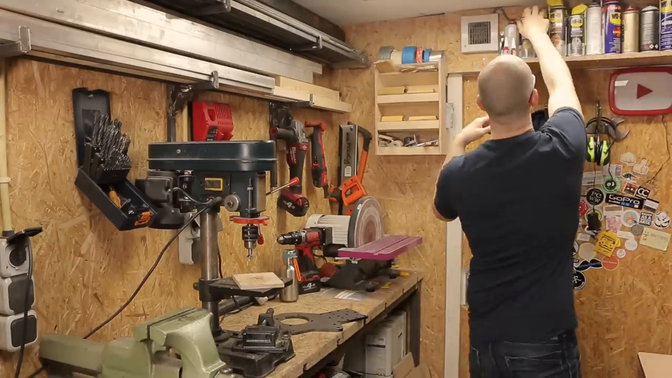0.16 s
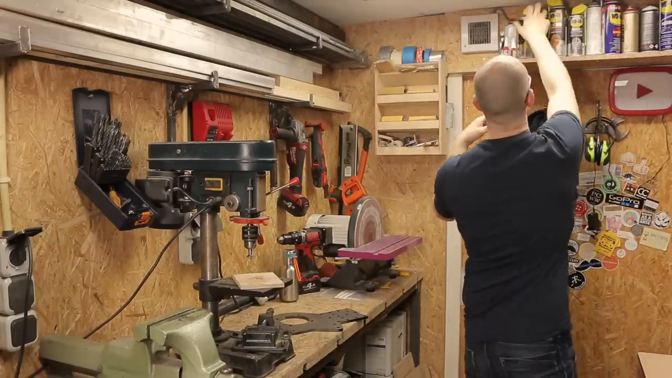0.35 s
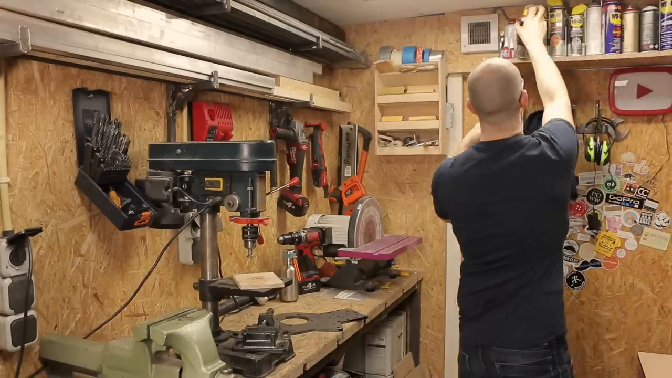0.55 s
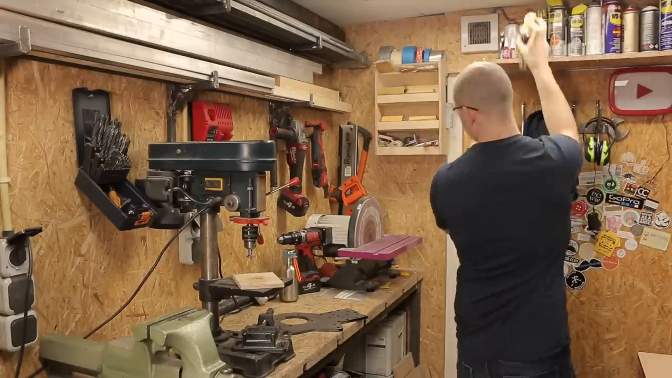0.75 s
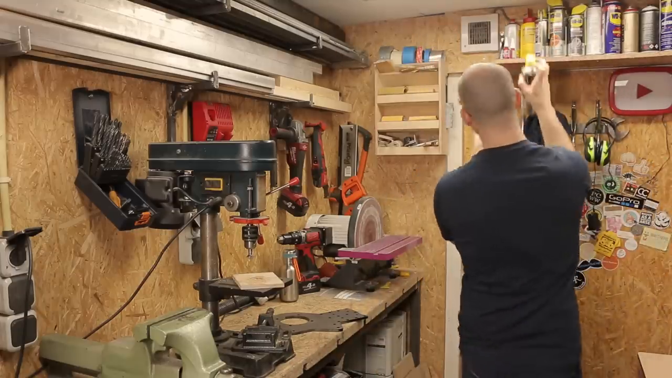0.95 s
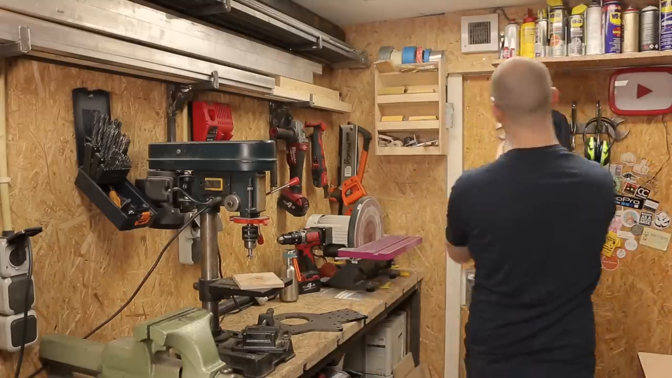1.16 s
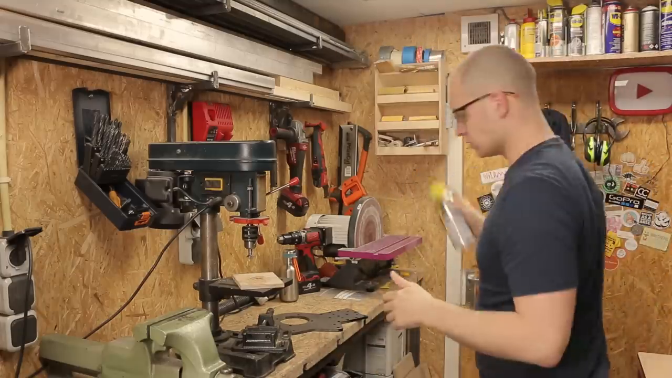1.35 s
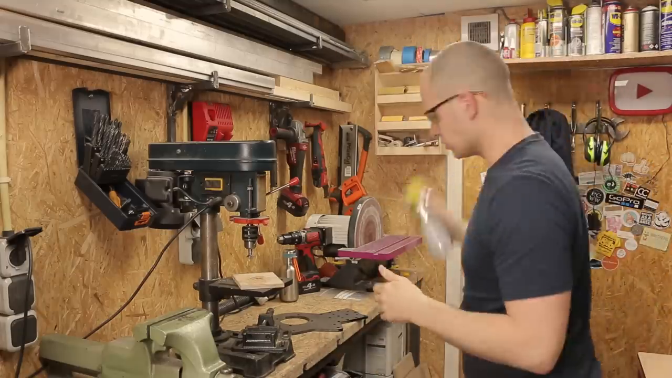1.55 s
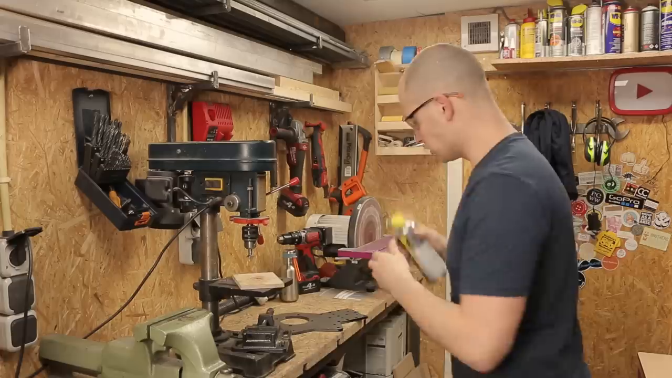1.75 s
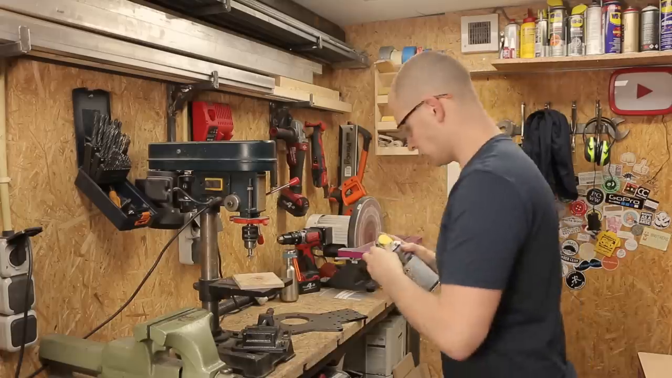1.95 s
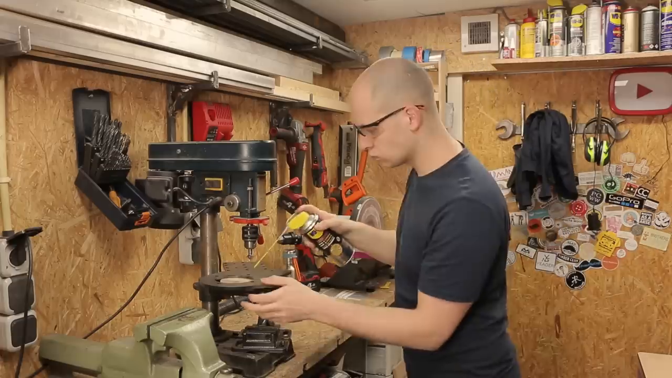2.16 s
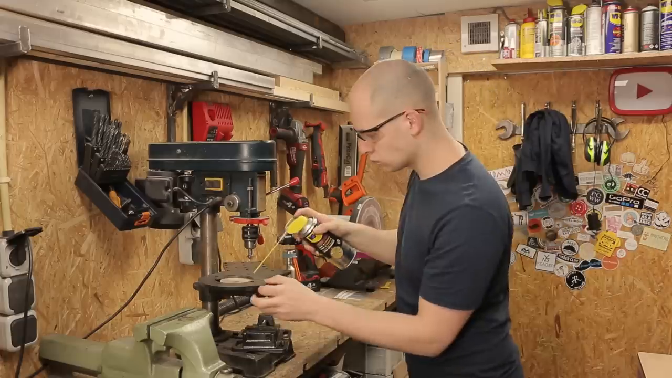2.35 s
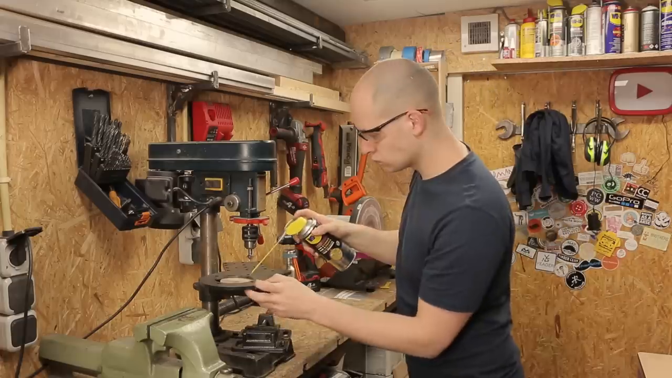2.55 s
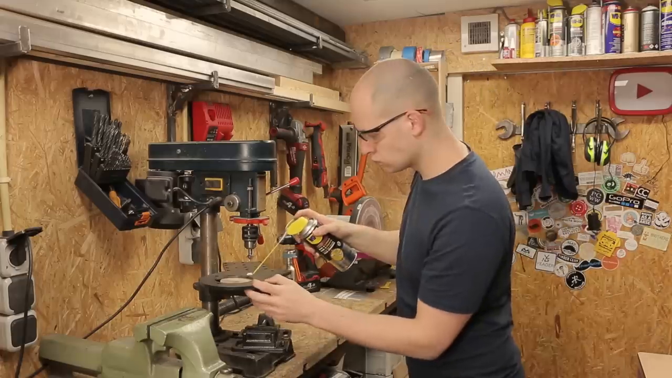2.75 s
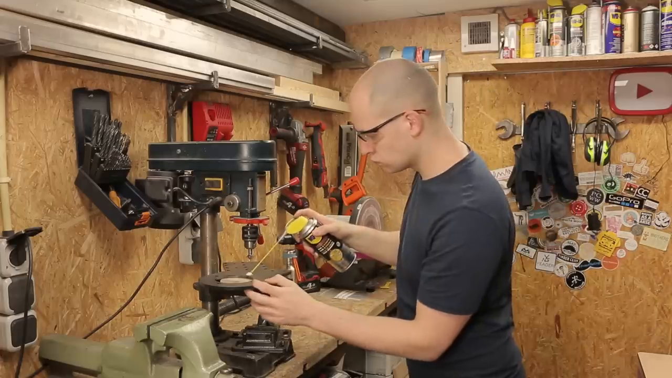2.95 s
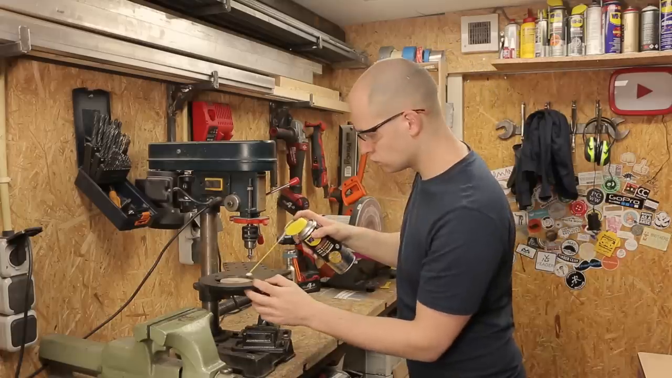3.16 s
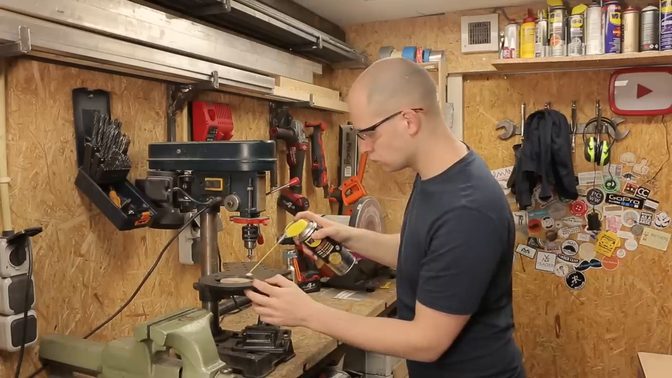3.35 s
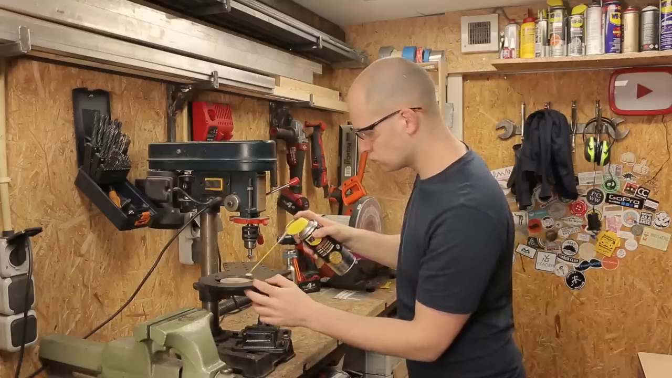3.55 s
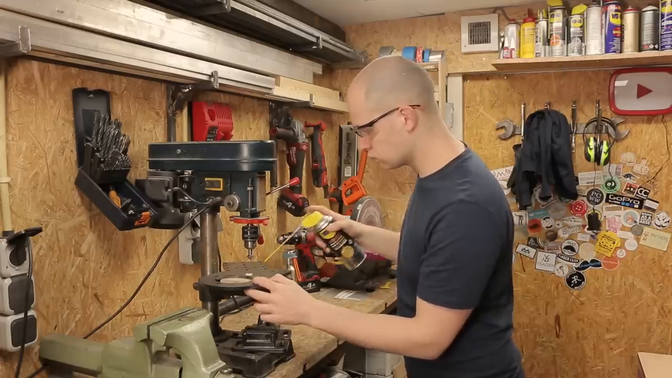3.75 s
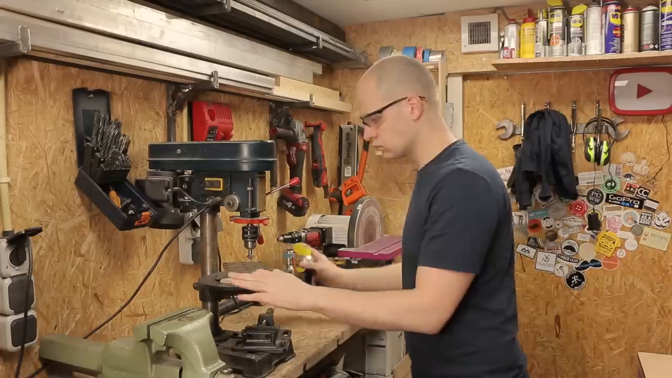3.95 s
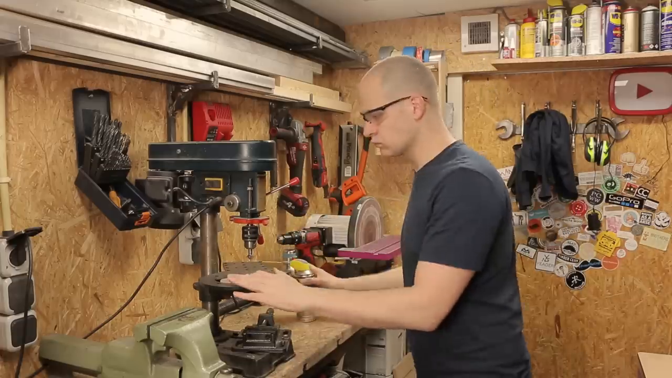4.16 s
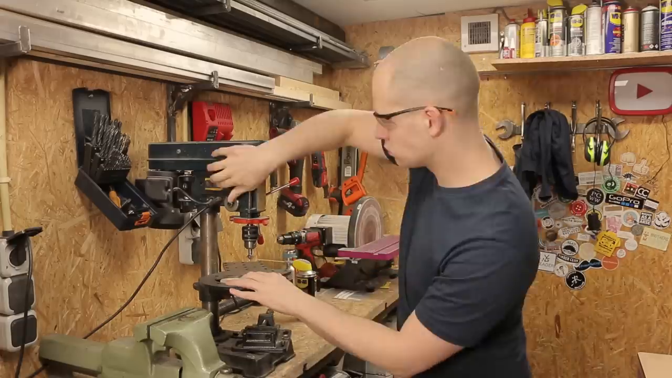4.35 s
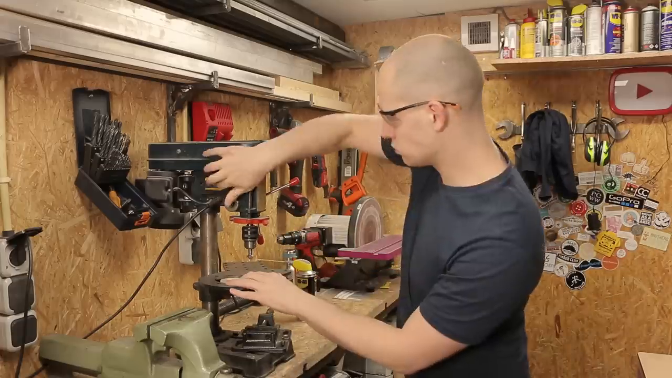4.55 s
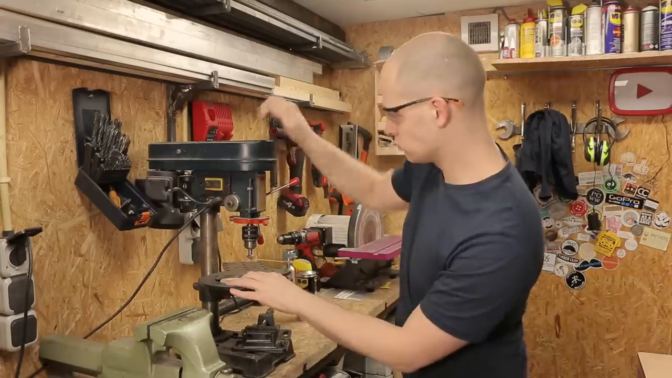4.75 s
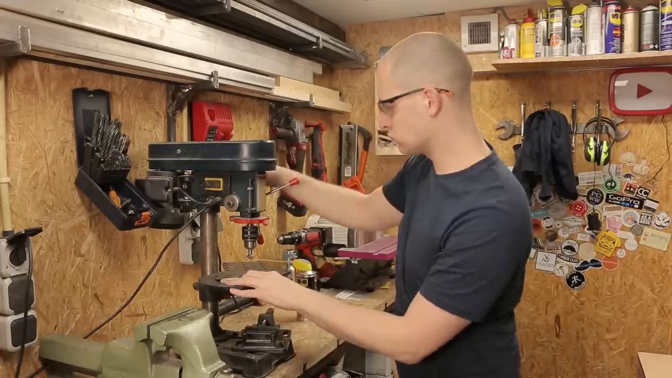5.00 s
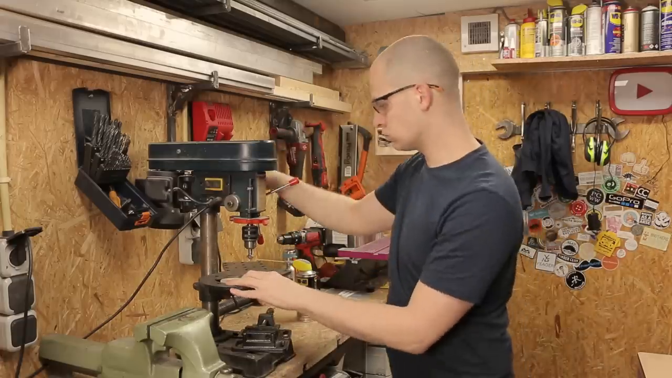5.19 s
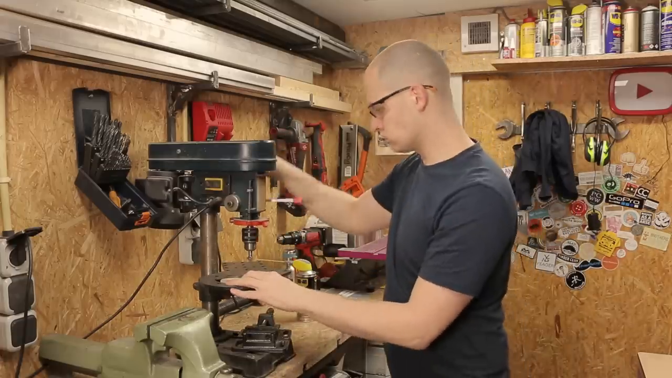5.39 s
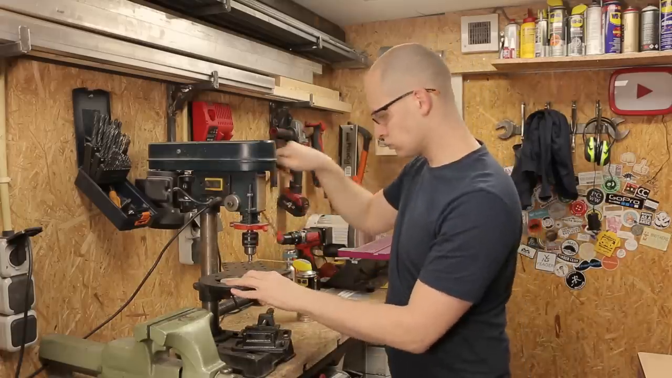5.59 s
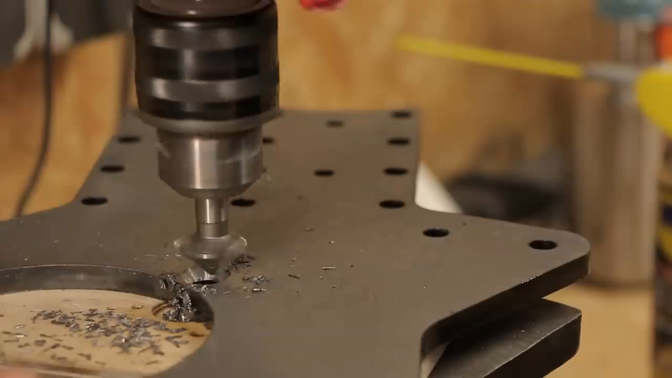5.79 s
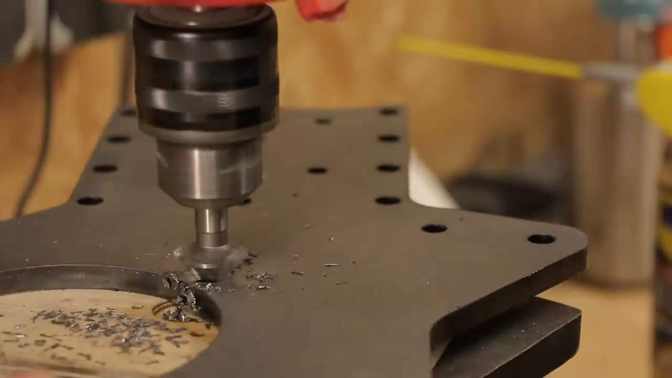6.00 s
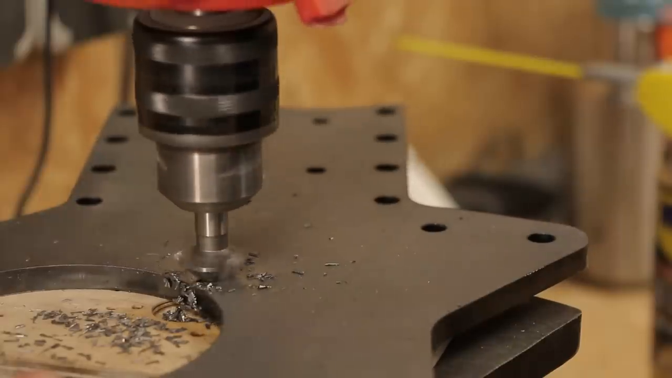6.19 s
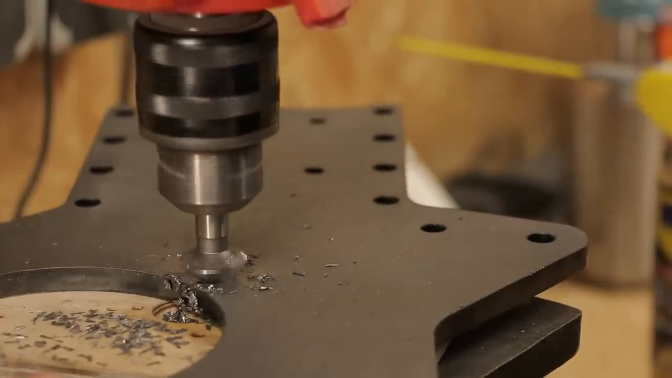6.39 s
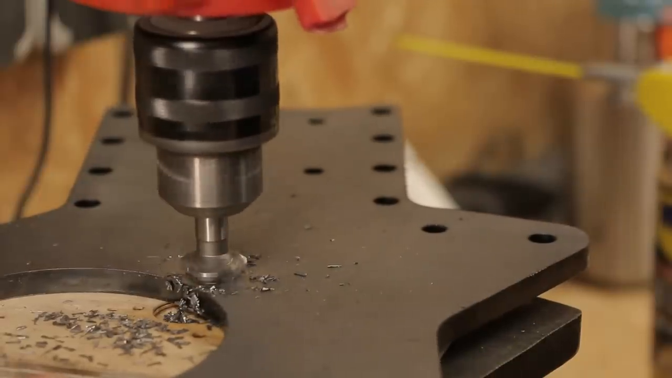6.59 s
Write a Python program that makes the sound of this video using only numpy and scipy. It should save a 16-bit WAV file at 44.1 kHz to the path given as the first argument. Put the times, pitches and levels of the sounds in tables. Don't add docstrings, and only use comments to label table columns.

```python
import sys
import numpy as np
from scipy import signal
from scipy.fft import rfft, irfft, next_fast_len
from scipy.io import wavfile
from scipy.ndimage import uniform_filter1d

SR = 44100
rng = np.random.default_rng(int(sys.argv[2]) if len(sys.argv) > 2 else 0)


def materialize(psi):
    bounded = np.clip(np.atleast_2d(psi).T, -1, 1)
    quanta = np.round(bounded * 32767).astype(np.int16)
    wavfile.write(sys.argv[1], SR, quanta)


def voltage_ratio(decibels):
    exponent = np.asarray(decibels, float) / 20
    return 10 ** exponent


N = 292559
TIME = np.arange(N) / SR

# frequency [Hz], density [dB per Hz].
ROOM_SPECTRUM = [(18, -32), (42, 0), (114, -1.5), (195, -16), (363, -14), (988, -26), (1650, -25.5),
                 (3520, -27.5), (3820, -23), (5570, -28.5), (7710, -30.5), (16000, -31.5)]
# frequency [Hz], density [dB per Hz].
STANDBY_SPECTRUM = [(30, -12), (70, 2), (150, -7), (350, -1), (550, -26), (1150, -8), (2500, -18),
                    (5000, -40), (16000, -70)]
# hits and handling break off, then resume, both in seconds [s].
GAP = (4.386, 4.502)
# frequency [Hz], density [dB per Hz].
CLOTH_SPECTRUM = [(880, -23), (1500, -7), (2340, -5.5), (4420, 2), (5280, -5), (12900, -17.5), (16000, -20)]
# frequency [Hz], density [dB per Hz].
SCRAPE_SPECTRUM = [(150, -56), (250, -10), (420, -2.5), (512, -17), (593, -5), (818, -5), (3000, -16),
                   (3900, -66), (6600, -120)]
# peak [s], level [dB], swell [s], fade [s], both over 20 dB.
SLEEVE_STROKES = [(.03, -51, 0.33, 0.13), (.62, -51, 0.18, 0.052), (.776, -53, 0.24, 0.32),
                  (.95, -32, 0.031, 0.056), (1.135, -38, 0.13, 0.086), (1.235, -39, 0.036, 0.081),
                  (1.34, -41.5, 0.11, 0.076), (1.407, -37.5, 0.035, 0.12), (1.56, -44, 0.48, 0.24),
                  (1.66, -34, 0.13, 0.079), (1.763, -42, 0.17, 0.086), (1.9, -56, 0.47, 0.33),
                  (2.318, -59, .26, .05), (4.25, -51, 0.14, 0.29), (4.52, -45, 0.034, 0.037)]
# peak [s], level [dB], swell [s], fade [s], can resonance [Hz].
CAN_RUBS = [(.044, -52.5, .3, 0.11, 1100), (.3, -46, .03, 0.073, 672), (.5, -53.5, 0.15, 0.41, 714),
            (.776, -46, 0.21, 0.2, 1220), (.95, -32.5, 0.038, .11, 1130), (1.125, -38, 0.073, 0.025, 1170),
            (1.15, -27.5, 0.031, 0.045, 915), (1.34, -39.5, 0.07, 0.058, 1090),
            (1.407, -34.5, 0.032, 0.16, 1780), (1.56, -43, 0.093, 0.9, 1820),
            (1.669, -25.5, 0.079, 0.056, 1340), (1.763, -31, 0.14, 0.049, 1440),
            (2.15, -65, 0.04, 0.034, 1460), (2.4, -38, 0.1, 0.035, 1720), (4.18, -27.5, 0.017, 0.087, 714),
            (4.26, -44, 0.06, 0.56, 776), (4.52, -58, 0.023, 0.055, 864)]
# peak [s], level [dB], swell [s], fade [s], resonance [Hz].
WEIGHT_SHIFTS = [(.54, -37, 0.24, 0.43, 109), (.92, -40.5, 0.25, 0.19, 243), (1.7, -40, 0.53, 0.012, 330),
                 (3.15, -48, 0.041, 0.39, 101), (3.68, -37.5, 0.21, 0.14, 148),
                 (3.78, -36.5, 0.34, 0.17, 103), (4.19, -24, .012, 0.45, 236),
                 (4.32, -24.5, 0.11, 0.2, 252)]
# start [s], peak [dB], body [Hz], T60 [s].
BODY_BUMPS = [(.223, -30, 180, 0.21), (0.261, -23, 192, 0.17), (0.274, -36, 70, 0.26),
              (0.464, -26, 160, 0.12), (0.471, -24.5, 70.6, 0.24), (0.927, -35, 104, 0.36),
              (2.25, -55, 3800, 0.44), (3.25, -44.5, 334, 0.96), (4.154, -30, 60, 0.93),
              (4.506, -42, 412, .3), (4.756, -22, 299, 0.23), (5.905, -22, 710, 0.15)]
# start [s], peak [dB], body [Hz], T60 [s], crack [dB].
HOLLOW_TAPS = [(0.264, -23.5, 686, 0.073, -29), (.465, -39.5, 660, 0.044, 1),
               (.552, -44.5, 3640, 0.33, 0.5), (.707, -34, 610, 0.033, -10), (.764, -37, 980, 0.076, 8),
               (0.9212, -12.5, 953, 0.093, -18), (0.9212, -22.5, 392, 0.049, -25),
               (.926, -19.5, 1335, 0.13, 1), (1.074, -33, 4550, 0.15, -18.5), (1.134, -19, 764, 0.03, -1),
               (1.229, -35, 2020, 0.13, -10), (1.402, -26.5, 1810, 0.11, -6), (1.43, -32, 1600, 0.14, 4.5),
               (1.733, -33, 1250, .05, -10), (1.742, -27, 1320, .05, -14), (1.753, -27, 1280, 0.049, -18),
               (1.753, -27, 2150, 0.04, -13), (1.763, -25, 1070, 0.061, -14),
               (1.764, -28, 2190, 0.056, -17), (1.774, -33, 2030, .05, -10), (1.85, -41, 1790, 0.04, -11.5),
               (1.93, -45, 1740, 0.037, -15), (2.098, -47, 1840, .05, -15),
               (2.135, -39.5, 2330, 0.029, -24), (2.156, -54, 1670, 0.024, -15), (.223, -49, 1940, 0.11, 5),
               (.225, -45, 785, 0.1, -10), (0.264, -54, 2650, 0.17, -15), (.552, -49, 2200, .04, -5),
               (.628, -45, 1900, 0.064, -15), (.688, -46, 650, 0.081, -3), (1.978, -37.5, 1750, 0.05, -3.5),
               (2.683, -23.5, 3860, .026, -17), (4.721, -16, 1710, 0.041, -24)]
# start [s], peak [dB], centre [Hz], T60 [s],
# crack [dB].
DRY_TICKS = [(1.2296, -33.5, 8900, 0.071, 1.5), (2.134, -33.5, 4000, .04, -1), (2.341, -45, 3500, .05, -12),
             (2.358, -24, 3460, 0.11, -26), (3.197, -37, 8000, .03, -14), (3.205, -34, 7500, .03, -14),
             (3.826, -42, 8000, .03, -14), (3.855, -40, 8500, .03, -14), (3.319, -31, 9000, .12, 1.5),
             (3.842, -38, 7630, 0.085, -9), (3.873, -33, 7500, 0.058, -1.5), (2.359, -27, 1800, .1, -25),
             (4.38, -26, 1600, 0.045, -3), (4.505, -35, 5930, 0.068, 5)]
# frequency [Hz], level [dB], T60 [s].
CAP_MODES = [(743, -18, .1), (880, -15, .1), (1320, -16, .12), (1560, -4, 0.055), (1743, -2, 0.2),
             (1820, 5, 0.12), (2270, -18, .15), (3210, -24, 0.14), (3445, -16, 0.093), (4100, -22, 0.16),
             (4800, -25, 0.15)]
# start [s], peak [dB].
CAP_SNAPS = [
    (2.3575, 0.5),
]
# frequency [Hz], level [dB], T60 [s].
CAN_MODES = [(250, 9.5, 0.15), (197, 4.5, 0.18), (307, -8.5, 0.093), (415, -10.5, 0.21), (546, -5, 0.11),
             (653, -2, 0.16), (800, -5, 0.079), (998, -6.5, 0.16), (1250, -11, 0.021), (1405, 7, 0.03),
             (1900, -5.5, 0.025), (2640, -21, 0.049), (3220, -3, 0.033), (4250, -10.5, 0.071),
             (4800, -14, 0.045)]
# start [s], level [dB], contact [Hz].
CAN_BLOWS = [
    (4.1493, -3.5, 4950),
    (4.178, -17, 400),
    (4.197, -31, 400),
]
# start [s], level [dB], bench resonance [Hz], T60 [s].
CAN_ROCKS = [(4.222, -18, 240, .08), (4.246, -10, 266, .07), (4.271, -8, 267, .06), (4.289, -11, 250, .07),
             (4.306, -14, 299.5, 0.22), (4.251, -6, 1340, .4), (4.305, -5, 1338, .4),
             (4.353, 1.5, 265, 0.096), (4.354, -12, 160, 0.1), (4.364, -7, 340, 0.048)]
# frequency [Hz], level [dB], T60 [s].
SWITCH_MODES = [(110, -17, 0.66), (416, -15, 0.38), (1060, -4.5, 0.024), (2200, -8, 0.04),
                (4310, -2.5, 0.022), (6560, -8, 0.12), (6800, -12, 0.17)]
# start [s], peak [dB].
SWITCH_CLACKS = [
    (4.504, -8.5),
]
# time [s], jet level [dB], gas share of the top end [dB].
VALVE_PRESSES = [
    [(2.612, -73, -3), (2.616, -52, -16), (2.64, -36, -8), (2.67, -40.5, 1.5), (2.682, -31.5, -0.5),
     (2.714, -32, -9), (2.798, -27.5, -7.5), (2.912, -31.5, -5), (3.0, -32, -7.5)],
    [(3.0, -31, -7.5), (3.132, -39, -10.5), (3.148, -36.5, -4.5), (3.196, -42, -15), (3.224, -42.5, -9),
     (3.24, -38.5, -5), (3.274, -51, -21), (3.308, -54, -12), (3.314, -44, -16)],
    [(3.314, -53, -9), (3.322, -55, 17), (3.338, -41, 3.5), (3.476, -37, -4), (3.604, -31.5, -9.5),
     (3.646, -38.5, -11), (3.7, -36, -3)],
    [(3.7, -35.5, -12), (3.744, -43, -10), (3.77, -39, -5), (3.792, -37, -16), (3.834, -50, -22),
     (3.842, -53, -16), (3.866, -48, -5), (3.874, -46, -9), (3.95, -59, -12)],
]
# frequency [Hz], density [dB per Hz].
JET_SPECTRUM = [(180, -47), (300, -28), (656, -5.5), (1030, -11.5), (1360, -6), (2320, -5), (2980, -2),
                (16000, -6)]
# frequency [Hz], width [Hz], level [dB].
STRAW_PEAKS = [(2360, 200, -3), (3030, 200, 0), (3910, 260, 0), (4620, 180, -2), (5310, 180, -4),
               (6500, 200, -5), (7620, 220, -2), (9920, 260, -2), (12200, 260, -3), (13500, 260, -4)]
# multiple of the turn rate [1], level [dB].
PULLEY_ORDERS = [(8, -50), (9, -44), (10, -37), (13, -49), (14, -43), (29, -40)]
# frequency [Hz], density [dB per Hz].
RUMBLE_SPECTRUM = [(65, -18), (110, -6), (226, -6.5), (415, 0), (489, -4.5), (708, 0), (851, -5),
                   (1430, -10.5), (1590, -22), (1840, -16), (2430, -25), (2620, -23), (9000, -27.5),
                   (11700, -44), (19800, -120)]
# frequency [Hz], width [Hz], level [dB].
HEAD_PEAKS = [(300.6, 47, -9), (359, 33, -5), (388.4, 29, -13.5), (424.3, 35, -4), (543.4, 37, -13),
              (235.7, 14, -11.5), (1270, 18, -4), (659, 23, -12), (706, 33, -9), (944, 18, -7.5),
              (1168, 40, -10), (3270, 52, 4.5)]
# frequency [Hz], width [Hz], level [dB].
FAN_PEAKS = [(1390, 150, 8), (1462, 45, 9), (1508, 45, 6), (1650, 600, 4), (1832, 80, 7), (2010, 140, -2)]
# start [s], peak [dB].
FAN_RATTLES = [(4.654, -23), (4.6872, -23), (4.7211, -17), (4.76, -19), (4.792, -14), (4.8536, -13.5),
               (4.89, -13), (4.934, -17.5), (4.9985, -30), (5.047, -26), (5.0848, -27), (5.135, -22),
               (5.1806, -17), (5.23, -15), (5.2799, -20), (5.337, -20), (5.384, -19), (5.4191, -20),
               (5.464, -19), (5.5323, -15), (5.5776, -11), (5.6276, -12), (5.6805, -13), (5.7493, -22),
               (5.8162, -28), (5.864, -17), (5.8945, -22), (5.9279, -38), (5.9798, -30), (6.0252, -21),
               (6.0616, -22), (6.113, -27), (6.1783, -26), (6.2217, -24), (6.297, -25), (6.3988, -34),
               (6.4702, -40), (6.529, -33), (6.5665, -38), (6.6153, -21)]
# frequency [Hz], width [Hz].
PLATE_MODES = [(3700, 350), (5520, 150), (5860, 150), (4600, 250)]
# peak [s], plate ring [dB], swell [s], fade [s].
FEED_PUSHES = [
    (4.68, -36.5, .05, 0.77),
    (5.47, -26.5, 0.082, 0.36),
    (6.15, -33, 0.48, 0.97),
    (6.6, -38, 0.24, 0.35),
]
# frequency [Hz], density [dB per Hz].
BELT_SPECTRUM = [(1060, -33), (1800, -7), (2410, -10), (3770, -1.5), (5100, -0.5), (5700, -8.5),
                 (7630, -7.5), (13000, -11.5), (16000, -13.5)]
# frequency [Hz], width [Hz], level [dB].
GUARD_PEAKS = [(2616, 97, -1), (5540, 125, 1), (5870, 61, 8.5), (4617, 160, -10), (8870, 120, -9),
               (8240, 55, -14), (6530, 250, -1), (7230, 83, 2.5), (9700, 210, -3), (9800, 60, -8),
               (12750, 220, 0), (13400, 110, -4), (14000, 80, -5)]
# start [s], entry [dB], squeeze [dB], bright squeeze [dB].
BELT_JOINTS = [(4.63, -32, -21, -25.5), (4.754, -16.5, -25.5, -24.5), (4.8319, -21, -27.5, -29),
               (4.906, -21, -24.5, -27.5), (4.993, -24, -26, -28), (5.07, -25, -28, -26),
               (5.1542, -19, -27.5, -29.5), (5.235, -29, -26.5, -25), (5.3168, -25, -34, -36),
               (5.395, -28, -27.5, -28), (5.4784, -23, -27, -31.5), (5.557, -25, -28, -29),
               (5.643, -24, -28.5, -34), (5.7164, -31, -27, -27), (5.8024, -19, -31, -31),
               (5.88, -24, -28, -26.5), (5.962, -25, -27.5, -32.5), (6.044, -24, -26, -26.5),
               (6.12, -20, -27.5, -29.5), (6.201, -22.5, -23.5, -24.5), (6.2856, -27, -22, -27),
               (6.3639, -19.5, -38, -28), (6.447, -23, -27.5, -30), (6.5256, -24.5, -27, -27),
               (6.6054, -24, -27, -33)]

TURN_HZ = 6.19
START_S, GRIP_S, RUN_UP_S = 4.504, 4.595, .095
LOAD_S, LOAD_GROWS_S = 5.12, 0.67


def ramp(start, length):
    return np.clip((TIME - start) / length, 0, 1)


def rms_one(x):
    return x / np.sqrt(np.mean(x ** 2) + 1e-20)


def white_noise():
    return rng.standard_normal(N)


def butter(x, order, hz, kind="low"):
    return signal.sosfilt(signal.butter(order, hz, kind, fs=SR, output="sos"), x)


def peak(x, hz, width):
    r = np.exp(-np.pi * width / SR)
    return signal.lfilter([(1 - r * r) / 2, 0, (r * r - 1) / 2], [1, -2 * r * np.cos(2 * np.pi * hz / SR), r * r], x)


def steep_peak(x, hz, width):
    return peak(peak(x, hz, width), hz, width)


def moving_peak(x, centre_hz, pitches, sharp):
    out = np.zeros(N)
    for hz in pitches:
        near = np.exp(-(sharp * np.log(np.maximum(centre_hz, 1) / hz)) ** 2)
        out += near * rms_one(steep_peak(x, hz, 0.37 * hz))
    return out


def drift(rate):
    r = np.exp(-80 * np.pi * rate / SR)
    slow = signal.lfilter([1], [1, -2 * r, r * r], rng.standard_normal(N // 40 + 2002))[2000:]
    return np.interp(np.arange(N) / 40, np.arange(len(slow)), rms_one(slow))


def grainy(flicker_db, rate):
    return white_noise() * voltage_ratio(flicker_db * drift(rate))


def colour(x, spectrum, peaks=(), lift_db=6.0, wander_db=0, rate=8.0):
    size = next_fast_len(N)
    hz = np.fft.rfftfreq(size, 1 / SR) + 1
    corner_hz, corner_db = np.transpose(spectrum)
    db = np.interp(np.log(hz), np.log(corner_hz), corner_db)
    smooth = irfft(rfft(x, size) * voltage_ratio(db), size)[:N]
    out = smooth.copy()
    for top_hz, width, level_db in peaks:
        gain_db = lift_db + 0.77 * level_db + wander_db * drift(rate)
        out += voltage_ratio(gain_db) * steep_peak(smooth, top_hz, width)
    return rms_one(out)


def in_time(spans):
    out = np.full((len(spans[0][0]) - 1, N), -120.)
    for rows in spans:
        s, *columns = np.transpose(rows)
        inside = (TIME >= s[0]) & (TIME <= s[-1])
        out[:, inside] = [np.interp(TIME[inside], s, c) for c in columns]
    return out


def strokes(rows):
    rows, t = np.array(rows), TIME[::32]
    since = t - rows[:, [0]]
    length = np.maximum(np.where(since < 0, rows[:, [2]], rows[:, [3]]), .003)
    power = voltage_ratio(rows[:, [1]] - 20 * np.abs(since) / length) ** 2 + 1e-30
    total = power.sum(axis=0)
    hz = np.exp((power * np.log(np.abs(rows[:, [-1]]))).sum(axis=0) / total)
    return np.interp(TIME, t, 10 * np.log10(total)), np.interp(TIME, t, hz)


def latest(starts):
    return np.clip(np.searchsorted(starts, TIME) - 1, 0, None)


def strike(hits, modes, damping):
    out = np.zeros(N)
    for s, blow_db, contact_hz in hits:
        first = int(s * SR)
        t = TIME[:min(SR // 2, N - first)]
        build_up = 1 - np.exp(-3.0 * contact_hz * t)
        for k, (hz, level_db, t60) in enumerate(modes):
            fade = voltage_ratio(blow_db + level_db - 60 * t / np.clip(damping * t60, .01, .4))
            fade = fade * build_up / (1 + (hz / contact_hz) ** 2)
            sign = -1 if k == 0 else 1
            out[first:first + len(t)] += sign * fade * np.sin(2 * np.pi * hz * t)
    return out


def room(x):
    t, t60 = TIME[:SR // 3], 0.13
    low = signal.lfilter([.2], [1, -.8], rng.standard_normal(len(t))) * voltage_ratio(-60 * t / t60)
    high = 0.16 * rng.standard_normal(len(t)) * voltage_ratio(-60 * t / (0.154 * t60))
    tail = butter((low + high) * (t > .004), 2, 170, "high")
    return signal.fftconvolve(x, tail / np.sqrt(np.sum(tail ** 2)))[:N]


def room_tone():
    duck_db = -14 * np.exp(-((TIME - 4.205) / .03) ** 2)
    return voltage_ratio(-51 + duck_db + 0.09 * drift(27.0)) * colour(white_noise(), ROOM_SPECTRUM)


def standby():
    return voltage_ratio(-58.0) * (TIME > GAP[0]) * colour(white_noise(), STANDBY_SPECTRUM)


def handling():
    cloth_db, _ = strokes(SLEEVE_STROKES)
    cloth = voltage_ratio(cloth_db + 2.0) * colour(grainy(1.1, 60), CLOTH_SPECTRUM)
    scrape_db, can_hz = strokes(CAN_RUBS)
    rub = grainy(0.35, 60)
    scrape = 0.93 * colour(rub, SCRAPE_SPECTRUM)
    scrape += 0.58 * moving_peak(rub, can_hz, np.geomspace(600, 2400, num=7), 2.2)
    thud_db, thud_hz = strokes(WEIGHT_SHIFTS)
    thud = moving_peak(grainy(4.2, 24), thud_hz, np.geomspace(60, 400, num=7), 2.03)
    return cloth + voltage_ratio(scrape_db - 6.5) * scrape + voltage_ratio(thud_db - 8.0) * thud


def taps():
    out, t = np.zeros(N), TIME[:SR // 4]
    rows = [(*row, -24, 99) for row in BODY_BUMPS]
    rows += [(*row, 310) for row in HOLLOW_TAPS]
    rows += [(*row, 2000) for row in DRY_TICKS]
    for s, db, hz, t60, crack_db, width in rows:
        white = rng.standard_normal((2, len(t)))
        click = 5.8 * np.sqrt(1000 / width) * (t == 0)
        rattle = white[0] * voltage_ratio(-60 * t / max(t60, .01)) + click
        body = steep_peak(rattle, hz, 0.71 * width)
        edge_hz = min(1.08 * hz + 3500, .4 * SR)
        crack = 0.87 * butter(white[1], 2, edge_hz) * voltage_ratio(crack_db - 60 * t / max(1.46 * t60, .01))
        first = int(s * SR)
        out[first:first + len(t)] += voltage_ratio(db) * (body / np.abs(body).max() + crack)
    return out


def cap_snap():
    hits = [(s, db - 14.0, 9000) for s, db in CAP_SNAPS]
    return strike(hits, CAP_MODES, 0.42) * ramp(CAP_SNAPS[0][0], 0.00088)


def can_set_down():
    can = strike(CAN_BLOWS, CAN_MODES, 0.22)
    for s, db, hz, t60 in CAN_ROCKS:
        can += strike([(s, db, 150)], [(hz, 0, t60)], 1)
    since = np.maximum(TIME - CAN_BLOWS[0][0], 0)
    fade = voltage_ratio(-18 - 60 * since / 0.018) + voltage_ratio(-32 - 60 * since / 0.092)
    slap = (since > 0) * fade * butter(white_noise(), 2, 4800)
    return can + slap


def power_switch():
    return strike([(s, db - 14.0, 20000) for s, db in SWITCH_CLACKS], SWITCH_MODES, 0.85)


def spray():
    jet_db, gas_db = in_time(VALVE_PRESSES)
    sputter_db = np.clip(2.5 + 0.32 * (-41.5 - jet_db), .5, 4.0)
    jet = colour(grainy(sputter_db, 52), JET_SPECTRUM, STRAW_PEAKS, lift_db=0.3, wander_db=3.5, rate=10.5)
    body = signal.sosfiltfilt(signal.butter(1, 5500, fs=SR, output="sos"), jet)
    top = signal.sosfiltfilt(signal.butter(4, 10200, "high", fs=SR, output="sos"), jet)
    upper = jet - body - top
    return voltage_ratio(jet_db + 4.5) * (body + upper * voltage_ratio(1.27 * gas_db + 4.5) + top * voltage_ratio(gas_db + 3.0))


def mains_hum():
    rise_db = -16 * (1 - ramp(START_S, 0.17))
    load_db = -1.5 * ramp(LOAD_S, LOAD_GROWS_S)
    cut_out_db = -31 * np.exp(-((TIME - 4.8) / 0.012) ** 2)
    hum_db = -30.5 + rise_db + load_db + cut_out_db
    return (TIME > START_S) * voltage_ratio(hum_db + 3.0) * np.sin(2 * np.pi * 100.1 * TIME)


def pulley_wobble():
    speed = ramp(4.45, 0.46) ** 0.47
    turns = np.cumsum(speed) * TURN_HZ / SR
    out = np.zeros(N)
    for k, db in PULLEY_ORDERS:
        out += voltage_ratio(db + 1.5 + 0.4 * drift(4.9)) * np.sin(2 * np.pi * (k * (turns + .49) + 0.13))
    return out * ramp(4.55, 0.15)


def rattling():
    rise_s, fade_s, bed_db = .008, .032, -11
    s, db = np.transpose(FAN_RATTLES)
    k = latest(s)
    since = np.maximum(TIME - s[k], 0)
    trend_db = np.interp(TIME, s, uniform_filter1d(db, size=7))
    burst = voltage_ratio(db[k] - trend_db - 20 * since / fade_s) * np.clip(since / rise_s, 0, 1) * 2
    return 20 * np.log10(uniform_filter1d(burst, size=101) + voltage_ratio(bed_db))


def head_rumble():
    rumble_db = -25.5 - 11.5 * (1 - ramp(GRIP_S, RUN_UP_S))
    looped = np.resize(rng.standard_normal(int(SR / TURN_HZ)), N)
    swing_db = 2.96 * drift(122) + 1.3 * drift(26) + .1 * rattling()
    drive = (0.61 * looped + white_noise()) * voltage_ratio(swing_db)
    rumble = colour(drive, RUMBLE_SPECTRUM, HEAD_PEAKS, lift_db=8.0, wander_db=2.2, rate=20.0)
    return (TIME > START_S) * voltage_ratio(rumble_db + 1.5) * rumble


def fan_whir():
    whir_db = -27.5 - 16 * (1 - ramp(GRIP_S, RUN_UP_S)) - 10.5 * ramp(5.39, 0.36)
    air = grainy(1.0, 47) * voltage_ratio(rattling())
    whir = np.zeros(N)
    for hz, width, db in FAN_PEAKS:
        whir += voltage_ratio(db) * voltage_ratio(.5 * drift(19.0)) * rms_one(steep_peak(air, hz, width))
    return (TIME > START_S) * voltage_ratio(whir_db - 6.0) * rms_one(whir)


def chuck():
    turn_db = 7 * np.cos(2 * np.pi * TURN_HZ * (TIME - 5.105))
    return (TIME > 4.63) * voltage_ratio(-44 + turn_db) * rms_one(peak(grainy(6.8, 13), 2610, 70))


def cutter():
    lower_db, _ = strokes(FEED_PUSHES)
    deeper_db = -45 + 10.5 * np.maximum(TIME - LOAD_S, 0)
    upper_db = np.where(TIME > GRIP_S, deeper_db, -120)
    bite = voltage_ratio(1.5 * np.cos(2 * np.pi * 2 * TURN_HZ * (TIME - 5.265)))
    rings = [rms_one(peak(bite * grainy(3.0, 30), hz, width)) for hz, width in PLATE_MODES]
    return voltage_ratio(lower_db - 4.0) * rings[0] + voltage_ratio(upper_db - 14.0) * sum(rings[1:])


def belt():
    s, entry_db, squeeze_db, bright_db = np.transpose(BELT_JOINTS)
    k = latest(s)
    gone = (TIME - s[k]) / np.diff(s, append=s[-1] + .08067)[k]
    squeeze = np.exp(-((gone - .33) / np.where(gone < .33, .16, .32)) ** 2) * (gone > 0)
    hiss = colour(grainy(2.6, 130), BELT_SPECTRUM, GUARD_PEAKS, lift_db=7.0, wander_db=3.5, rate=14.0)
    low = butter(hiss, 2, 7000)
    full_swish = voltage_ratio(squeeze_db[k] - 1.0) * squeeze ** 0.87 * low * voltage_ratio(1.5 * drift(25))
    bright_swish = voltage_ratio(bright_db[k]) * squeeze * (hiss - low) * voltage_ratio(1.5 * drift(30))
    entry = voltage_ratio(entry_db[k] - 10.5 - 66 * np.abs(gone) ** 2.04) * (gone > 0)
    thin = entry * butter(grainy(2.0, 150), 3, 8000, "high")
    steady = voltage_ratio(-36.5 + 1.5 * ramp(LOAD_S, LOAD_GROWS_S)) * ramp(4.62, 0.019) * butter(low, 2, 4800)
    return full_swish + bright_swish + thin + steady


def scene():
    before, after = TIME < GAP[0], TIME > GAP[1]
    hits = taps() + cap_snap() + can_set_down() + power_switch()
    early = hits * before
    early = (early + voltage_ratio(-15.0) * room(early)) * before
    late = hits * after + belt()
    late = late + voltage_ratio(-9) * room(late)
    press = mains_hum() + pulley_wobble() + head_rumble() + fan_whir() + chuck() + cutter()
    mid = room_tone() + standby() + handling() * (before | after) + early + spray() + press + late
    late_copy = np.roll(mid, 150)
    airy = voltage_ratio(-18) * butter(late_copy, 3, 2900, "high")
    side = airy + voltage_ratio(-56) * late_copy + voltage_ratio(-39) * peak(late_copy, 590, 330)
    return np.array([mid + side, mid - side])


def low_pass(x):
    return signal.sosfilt(signal.butter(12, 16150, fs=SR, output="sos"), x)


def record(dry):
    cut = signal.sosfilt(signal.ellip(8, .3, 50, 15900, fs=SR, output="sos"), dry)
    return low_pass(np.clip(cut, -1, 1))


dry = scene()
out = record(dry)
materialize(out)
```